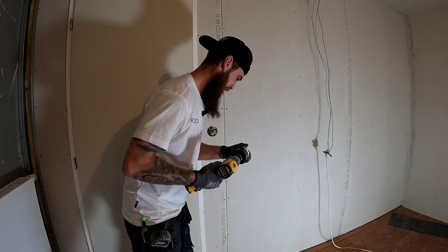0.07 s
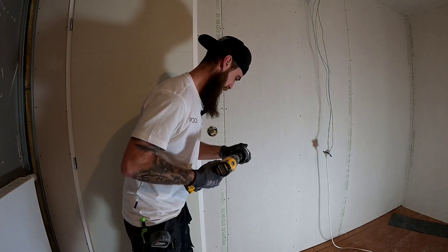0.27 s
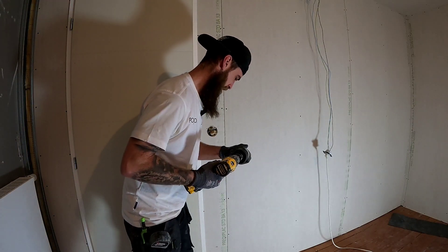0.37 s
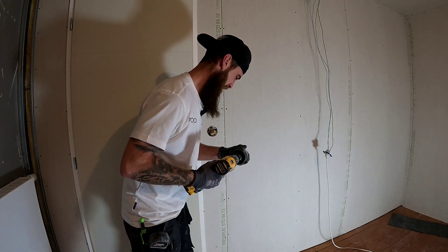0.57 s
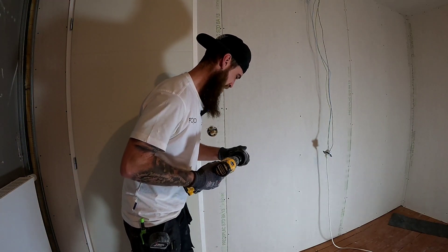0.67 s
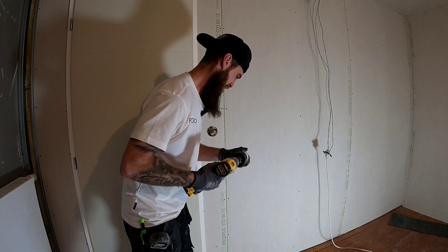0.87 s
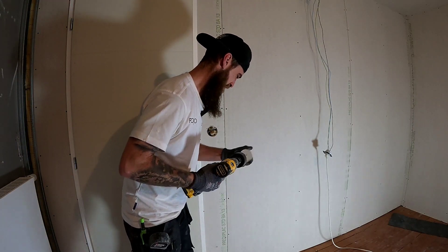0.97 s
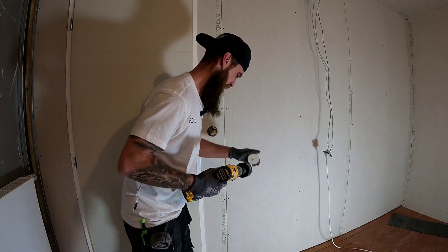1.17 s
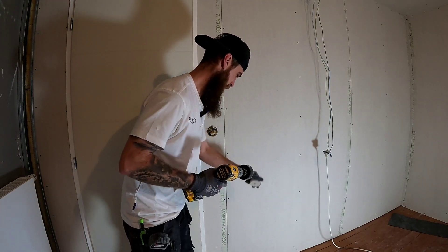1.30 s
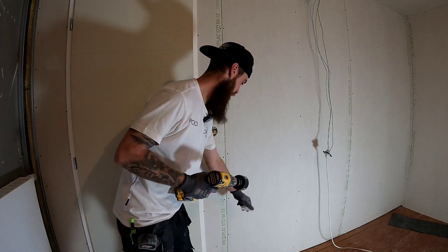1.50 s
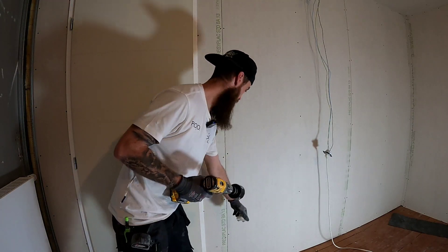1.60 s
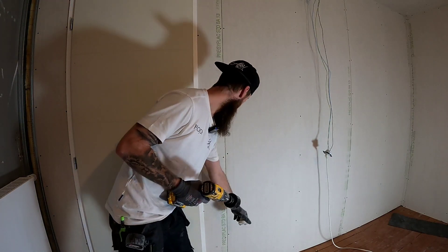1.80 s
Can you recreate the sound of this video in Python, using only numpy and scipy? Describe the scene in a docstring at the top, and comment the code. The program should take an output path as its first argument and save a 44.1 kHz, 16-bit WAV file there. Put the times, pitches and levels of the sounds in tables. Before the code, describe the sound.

A cordless drill with a hole saw spins up close by in a bare, echoing room, whines and rattles for about a second, then brakes with a clunk. Something small scrapes and taps the faintly ringing steel cup.

```python
"""In a bare, echoing room, a cordless drill with a hole saw runs free, close by.
The echo of an earlier burst dies away and the trigger twitches. The motor spins up and whines,
its gear teeth rattle and briefly squeal under strain, and it is braked with a clunk.
Later a small hard thing scrapes and taps the steel saw cup, which rings faintly."""
import sys
import numpy as np
from scipy import signal
from scipy.fft import rfft, irfft, next_fast_len
from scipy.io import wavfile
from scipy.ndimage import uniform_filter1d

SR = 44100
rng = np.random.default_rng(int(sys.argv[2]) if len(sys.argv) > 2 else 0)


def inscribe(sig):
    """Save sig as 16-bit PCM at rate SR to the path in sys.argv[1].

    A 1-D sig is mono; a 2-D sig holds one channel per row.
    Samples are clipped to [-1, 1] before scaling.
    """
    pcm = np.round(np.clip(np.atleast_2d(sig).T, -1, 1) * 32767)
    wavfile.write(sys.argv[1], SR, pcm.astype(np.int16))


N = 81585

# How loud the gears rattle; times below zero are the earlier burst: t/s, level/dB
RATTLE_LEVEL = [(-.3, -6.5), (-.04, -43), (-.025, -61), (.17, -51), (.178, -34.5), (.195, -33), (.205, -39),
                (.218, -32), (.236, -36.5), (.243, -23), (.26, -24.5), (.3, -19.5), (.36, -19), (.42, -18),
                (.8, -18), (1.2, -19), (1.27, -20), (1.288, -18.5), (1.31, -26.5), (1.33, -70)]
# Turns of the motor shaft per second: t/s, f/Hz
SHAFT_SPEED = [(.24, 60), (.27, 139), (.3, 204), (.338, 290), (.358, 326), (.388, 366), (.412, 423),
               (.45, 411), (.53, 405.4), (1.224, 405.6), (1.24, 386), (1.26, 338), (1.274, 280),
               (1.29, 200)]
# Tone colour of the drill's housing: f/Hz, relative level/dB
HOUSING_COLOUR = [(40, -29), (150, -29), (345, -24.5), (412, -18.5), (680, -12.5), (1000, -7), (1300, -7.5),
                  (2400, -10), (3140, -6.5), (3800, -14), (5000, -12.5), (6100, -15), (7400, -11),
                  (8200, -14.5), (9000, -18.5), (10000, -22.5), (11000, -24), (14800, -33.5), (16000, -29)]
# How that colour changes at low speed: f/Hz, relative level/dB
SLOW_COLOUR = [(300, 10.5), (1000, -3), (2000, -8.5), (3000, 0.5), (4200, 2.5), (6000, -0.5), (8000, 0),
               (10500, -7), (15000, -4)]
# The room's echo (a fade is the time to drop by 60 dB): f/Hz, fade/s, relative level/dB
ROOM_ECHO = [(150, 0.68, -5.5), (450, 0.63, 8), (1020, 1.46, -3.5), (1690, 1.06, 4), (2950, 0.91, -2.5),
             (3840, 0.73, 6.5), (5160, 0.82, 0), (7960, 0.58, -0.5), (14100, 0.61, -2.5)]
# The room's quiet background: f/Hz, relative level/dB
AIR_COLOUR = [(20, -6), (40, -12), (115, 1.5), (300, 1.5), (554, -0.5), (900, -13), (2830, -26),
              (6000, -21), (16000, -26)]
# Knocks of the mechanism and taps on the cup:
# t/s, thud level/dB, thud f/Hz, thud fade/s, crack gain/dB, crack f/Hz, ring level/dB
KNOCK_LIST = [(0.096, -57, 1050, 0.056, -40.5, 11000, -95), (.177, -53, 900, 0.026, -25, 8000, -90),
              (0.216, -24.5, 397, 0.023, -42, 5000, -90), (0.246, -23.5, 210, 0.04, -27, 7000, -70),
              (0.268, -40, 127.5, 0.52, -60, 5000, -90), (.365, -27, 109, 0.042, -43, 5000, -94),
              (1.284, -28.5, 304, 0.028, -12, 5000, -77), (1.286, -24, 624, 0.042, 2.5, 3300, -60),
              (1.434, -45.5, 69, 0.063, -62, 5000, -81), (1.645, -28, 1487, 0.0083, -38, 9000, -103),
              (1.652, -38, 1380, .006, -30, 7900, -94), (1.6599, -4.5, 1210, 0.0052, -25.5, 5500, -54),
              (1.661, -24, 198, 0.018, -60, 5000, -90), (1.6669, -19.5, 537, 0.013, -20, 4830, -66),
              (1.671, -33, 1120, 0.036, -46, 6950, -94), (1.718, -63, 1190, 0.011, -41, 6500, -90)]
# Ringing tones of the steel cup: f/Hz, relative level/dB, fade/s
CUP_TONES = [(2751, 0, 2.5), (4366, -7, 2.0)]
# Pitches of the whine, as multiples of the shaft speed
WHINE_MULTIPLES = [1, 2, 3, 4, 7, 8, 10, 12, 23]
# For each multiple: steady level/dB, speed-up level/dB, braking level/dB, waver rate/Hz
WHINE_TONES = [(-43, -50, -52, 20), (-33, -39, -44, 25), (-27, -25, -28, 30), (-41, -35, -44, 25),
               (-42, -40, -48, 25), (-28, -26, -40, 35), (-35, -42, -42, 30), (-44, -44, -48, 30),
               (-38, -28, -29, 90)]
# Squeals of the gears: start t/s, end t/s, start f/Hz, end f/Hz, level/dB
GEAR_SQUEALS = [(.305, .365, 3850, 5700, -28), (1.25, 1.284, 3400, 2650, -27),
                (1.264, 1.288, 4900, 3400, -26), (1.284, 1.31, 3300, 4400, -26)]
# Tone colour of the scrape: f/Hz, relative level/dB
SCRAPE_COLOUR = [(1500, -6.5), (4000, 0), (8000, -6), (12000, -17), (16000, -22)]
# Strength of the faint noise that sets left and right apart: f/Hz, gain/dB
STEREO_WIDTH = [(60, -16), (130, -19), (290, -19), (640, -24), (1410, -36), (3100, -33), (6820, -21),
                (11000, -16), (15000, -12)]


def amp(db):
    """Turns decibels into a factor to multiply by."""
    return 10 ** (np.asarray(db) / 20)


def unit_power(x):
    """Scales x to an average power of 1."""
    return x / np.sqrt(np.mean(x ** 2) + 1e-20)


def colour(x, points):
    """Filters x with a curve of (f/Hz, gain/dB) points."""
    size = next_fast_len(len(x))
    hz, db = np.transpose(points)
    gain_db = np.interp(np.log(np.fft.rfftfreq(size, 1 / SR) + 1), np.log(hz + 1), db)
    return irfft(rfft(x, size) * amp(gain_db), size)[:len(x)]


def wobble(size, hz):
    """Smooth complex noise of power 1, about hz wide: more hz, faster wobble."""
    memory = np.exp(-np.pi * hz / SR)
    noise = [1, 1j] @ rng.standard_normal((2, size + SR))
    smooth = signal.lfilter([1], [1, -memory], noise)[SR:]
    return smooth / np.sqrt(np.mean(abs(smooth) ** 2))


def gear_rattle(t, ticks_per_s=6000, hiss_share=.67, flicker_db=.37, full_speed_hz=400):
    """Uneven tooth ticks and air hiss pass through the housing; the colour shifts at low speed."""
    ticks = amp(2 * np.minimum(rng.exponential(size=len(t)), 3)) * rng.standard_normal(len(t))
    ticks *= rng.random(len(t)) < ticks_per_s / SR
    hiss = np.sqrt(hiss_share) * rng.standard_normal(len(t))
    fast = unit_power(colour(np.sqrt(1 - hiss_share) * unit_power(ticks) + hiss, HOUSING_COLOUR))
    slow = unit_power(colour(fast, SLOW_COLOUR))
    pace = np.clip(np.interp(t, *np.transpose(SHAFT_SPEED)) / full_speed_hz, 0, 1)
    flicker = flicker_db * np.sqrt(2) * wobble(len(t), 60).real
    return (pace * fast + (1 - pace) * slow) * amp(np.interp(t, *np.transpose(RATTLE_LEVEL)) + flicker)


def room_echo(x):
    """The walls send back dense echoes after a short gap; each pitch range fades at its own speed."""
    band_hz, fade_s, db = np.transpose(ROOM_ECHO)
    hz, t, bands = signal.stft(rng.standard_normal(SR), SR, nperseg=256)
    bands *= amp(-60 * t / np.interp(hz, band_hz, fade_s)[:, None])
    tail = signal.istft(bands, SR, nperseg=256)[1]
    tail *= np.clip(np.arange(len(tail)) / 400 - .5, 0, 1)  # the gap
    hz, _, bands = signal.stft(tail, SR, nperseg=256)
    energy_db = 10 * np.log10((abs(bands) ** 2).sum(1))
    tail = colour(tail, np.transpose([hz, np.interp(hz, band_hz, db) - energy_db]))
    return signal.fftconvolve(x, tail / np.linalg.norm(tail))[:len(x)]


def hush(t, db=-55):
    """A soft, low, steady background noise."""
    return amp(db) * unit_power(colour(rng.standard_normal(len(t)), AIR_COLOUR))


def knocks(t, thud_rise_s=.00022, crack_decay_s=.0012, band_ratio=1.28):
    """Each knock or tap makes a dying thud, a bright crack and a ring of the steel cup."""
    out, age = np.zeros(len(t)), np.arange(SR) / SR
    ring = sum(amp(db - 60 * age / fade) * np.sin(2 * np.pi * hz * age) for hz, db, fade in CUP_TONES)
    rise = 1 - np.exp(-(age / thud_rise_s) ** 2)
    for start, db, hz, fade, crack_db, crack_hz, ring_db in KNOCK_LIST:
        thud = amp(db - 60 * age / fade) * rise * np.sin(2 * np.pi * hz * age)
        edges_hz = [crack_hz / band_ratio, crack_hz * band_ratio]
        band = signal.butter(2, edges_hz, "band", fs=SR, output="sos")
        burst = rng.standard_normal(SR) * np.exp(-age / crack_decay_s)
        crack = amp(crack_db) * signal.sosfilt(band, burst)
        slot = out[np.searchsorted(t, start):][:SR]
        slot += (thud + crack + amp(ring_db) * ring)[:len(slot)]
    return out


def motor_whine(t, on_s=.275, off_s=1.288, rise_s=.04, fall_s=.006, jitter_hz=.9, waver_depth=.35):
    """Wavering tones at multiples of the shaft speed; speeding up or braking shifts their balance."""
    shaft_hz = uniform_filter1d(np.interp(t, *np.transpose(SHAFT_SPEED)), 300)
    hz_per_s = uniform_filter1d(np.gradient(shaft_hz) * SR, 600)
    load = np.clip(hz_per_s / np.where(hz_per_s > 0, 1500, 2500), -1, 1)  # below zero: braking
    angle = 2 * np.pi * np.cumsum(shaft_hz + jitter_hz * wobble(len(t), 25).real) / SR
    running = np.clip((t - on_s) / rise_s, 0, 1) * np.clip((off_s - t) / fall_s, 0, 1)
    out = np.zeros(len(t))
    for multiple, (steady_db, up_db, brake_db, waver_hz) in zip(WHINE_MULTIPLES, WHINE_TONES):
        waver = 1 + waver_depth * wobble(len(t), waver_hz)
        tone = (waver * np.exp(1j * (multiple * angle + 2 * np.pi * rng.random()))).real
        loaded_db = np.where(load > 0, up_db, brake_db)
        out += amp(steady_db + (loaded_db - steady_db) * abs(load)) * tone
    return np.sqrt(2) * running * out


def gear_squeals(t, roughness=.35):
    """Gears under strain give short, rough tones that glide, swell and fade."""
    out = np.zeros(len(t))
    for start, end, from_hz, to_hz, db in GEAR_SQUEALS:
        progress = np.clip((t - start) / (end - start), 0, 1)
        swell = np.sqrt(np.sin(np.pi * progress) + 1e-12)
        glide = np.exp(2j * np.pi * np.cumsum(from_hz + (to_hz - from_hz) * progress) / SR)
        out += amp(db) * swell * ((1 + roughness * wobble(len(t), 130)) * glide).real
    return np.sqrt(2) * out


def scrape(t, start_s=1.638, length_s=.048, db=-43.5):
    """A short, gritty scrape swells and fades around the tap on the cup."""
    progress = np.clip((t - start_s) / length_s, 0, 1)
    swell = np.sqrt(np.sin(np.pi * progress) + 1e-12)
    grit = rng.standard_normal(len(t)) * abs(wobble(len(t), 400))
    return amp(db) * swell * unit_power(colour(grit, SCRAPE_COLOUR))


def scene(lead_s=.3):
    """Drill, echo and hush sit in the middle; a faint noise sets left and right slightly apart."""
    t = np.arange(-round(lead_s * SR), N) / SR  # start early so the earlier burst leaves its echo
    gears = gear_rattle(t) + gear_squeals(t)
    whine = motor_whine(t)
    hits = knocks(t) + scrape(t)
    to_room = amp(-6.5) * gears + amp(-11) * whine + amp(-31) * hits
    middle = gears + whine + hits + hush(t) + room_echo(to_room)
    side_noise = colour(amp(6.5) * room_echo(to_room) + hush(t), STEREO_WIDTH)
    return np.array([middle + side_noise, middle - side_noise])[:, -N:]


def record(dry, low_hz=70, high_hz=15950):
    """Softens the deep bass and cuts off the highest treble."""
    thin = signal.sosfilt(signal.butter(2, low_hz, "high", fs=SR, output="sos"), dry)
    treble_cut = signal.firwin(511, high_hz, window=("kaiser", 9), fs=SR)
    return signal.oaconvolve(thin, treble_cut[None], "same")


dry = scene()
out = record(dry)
inscribe(out)
```